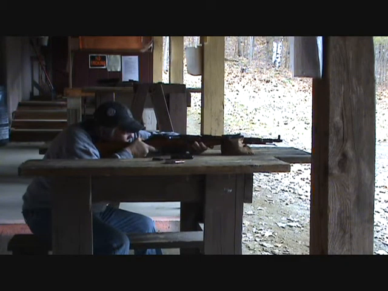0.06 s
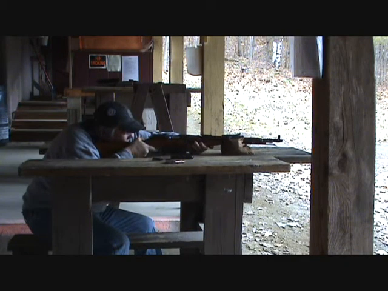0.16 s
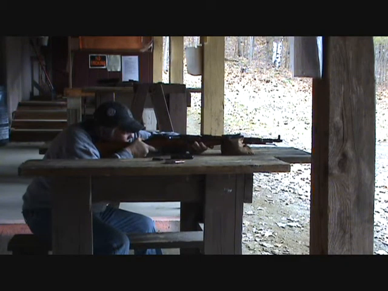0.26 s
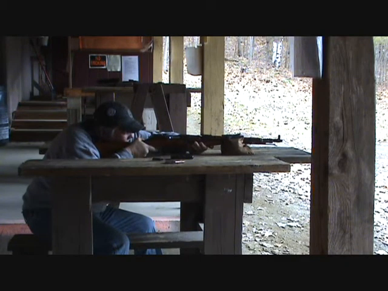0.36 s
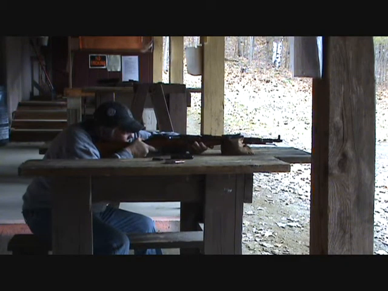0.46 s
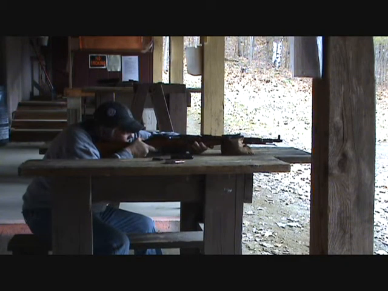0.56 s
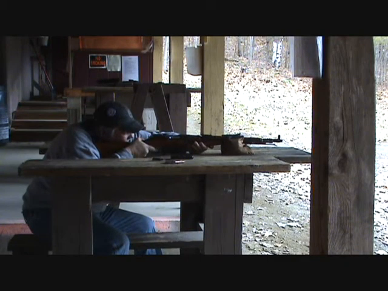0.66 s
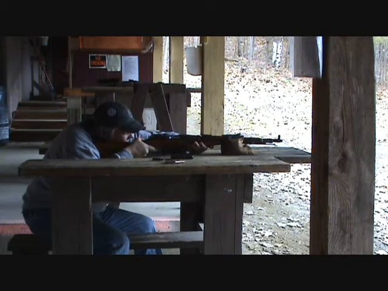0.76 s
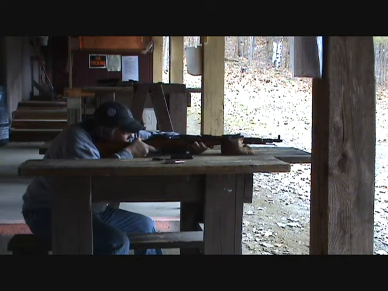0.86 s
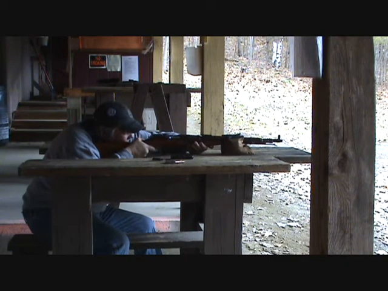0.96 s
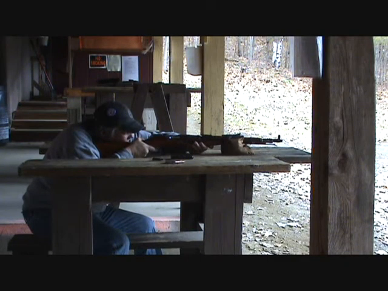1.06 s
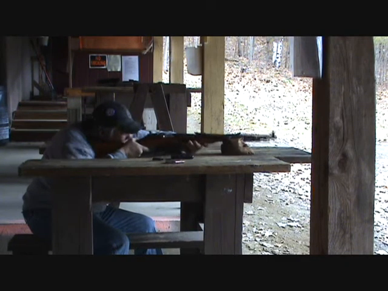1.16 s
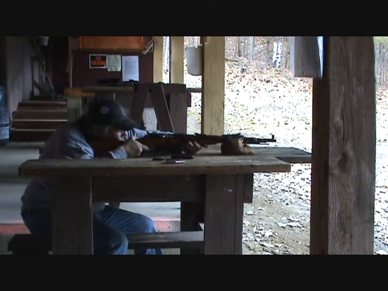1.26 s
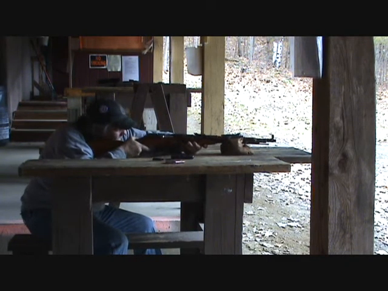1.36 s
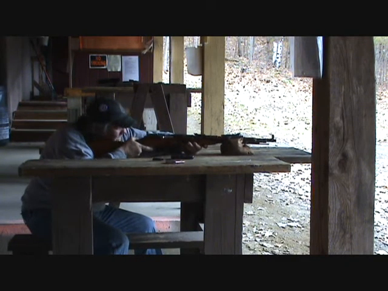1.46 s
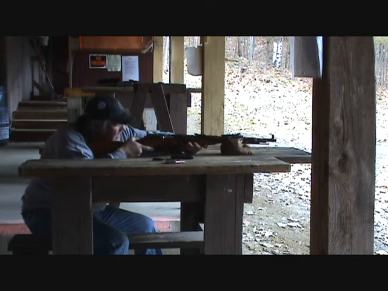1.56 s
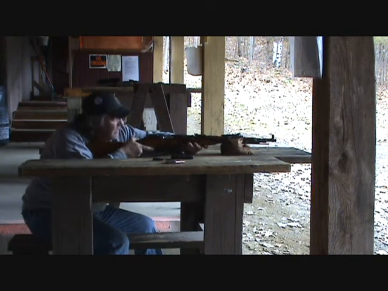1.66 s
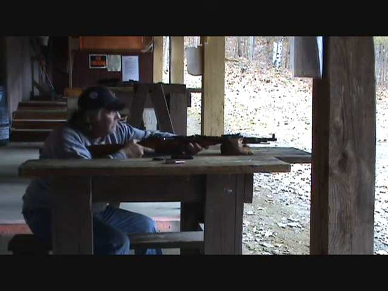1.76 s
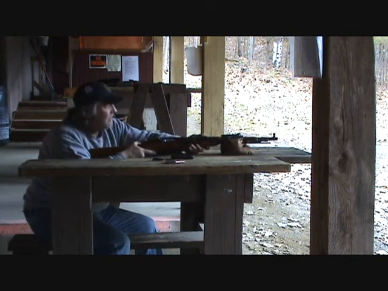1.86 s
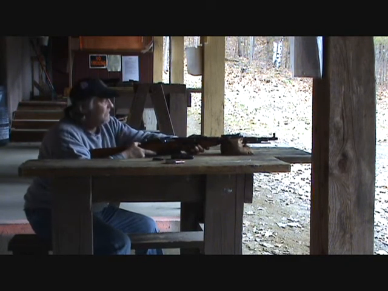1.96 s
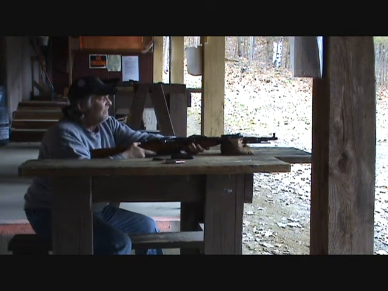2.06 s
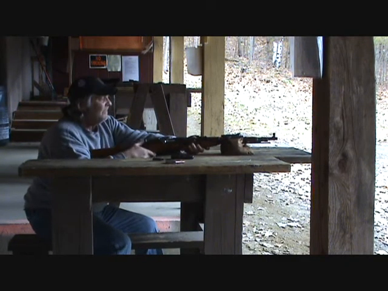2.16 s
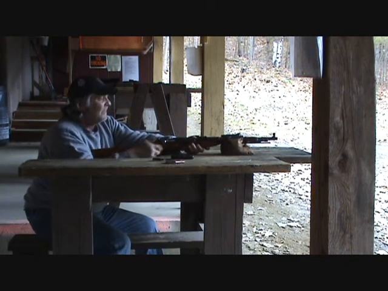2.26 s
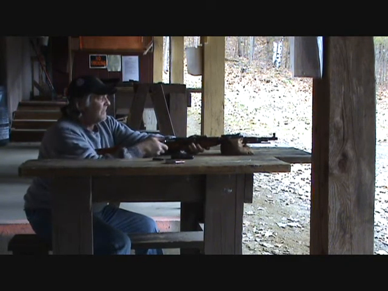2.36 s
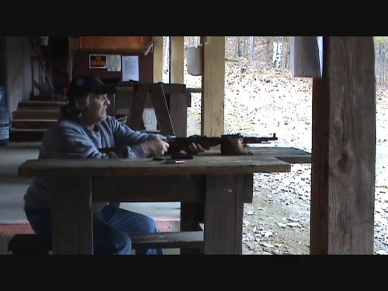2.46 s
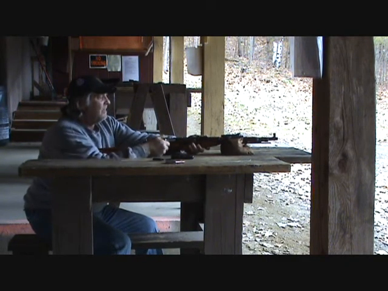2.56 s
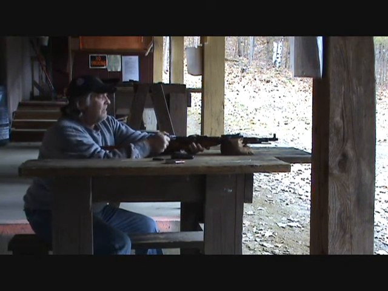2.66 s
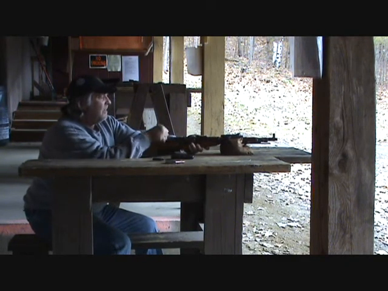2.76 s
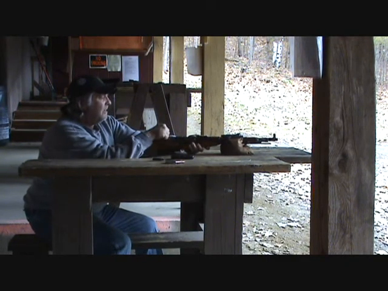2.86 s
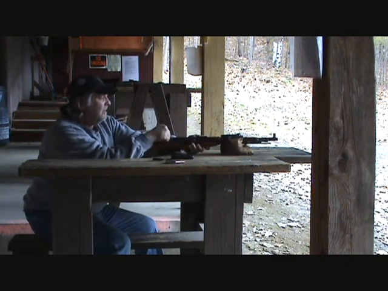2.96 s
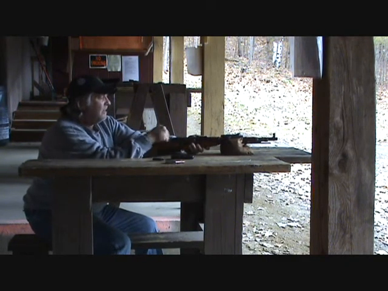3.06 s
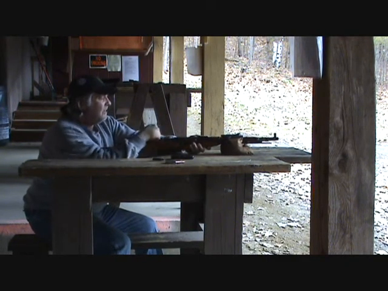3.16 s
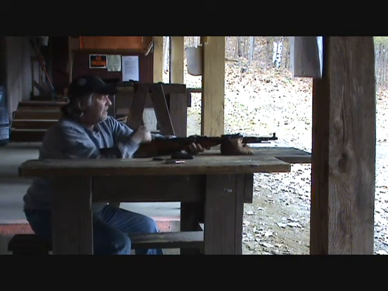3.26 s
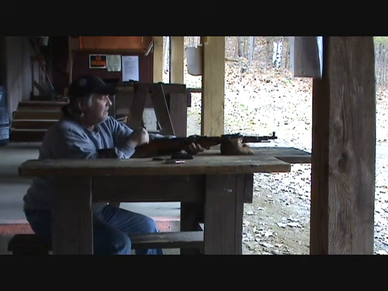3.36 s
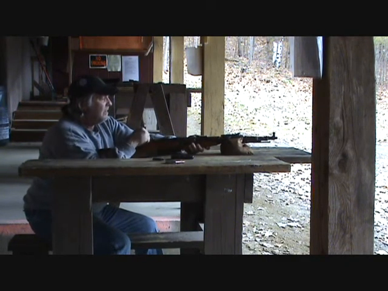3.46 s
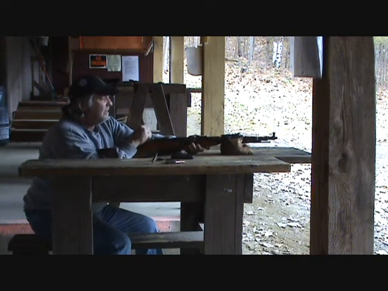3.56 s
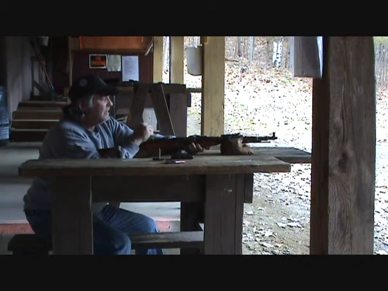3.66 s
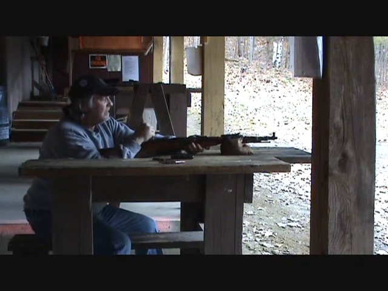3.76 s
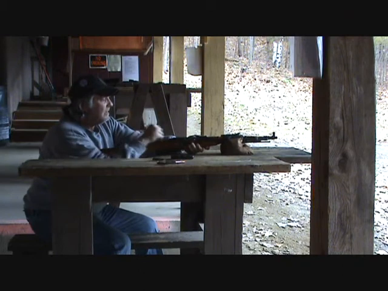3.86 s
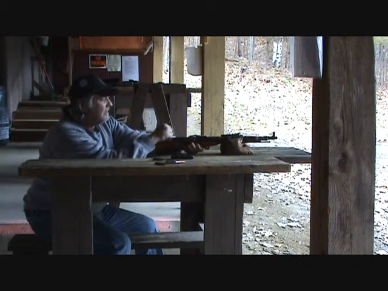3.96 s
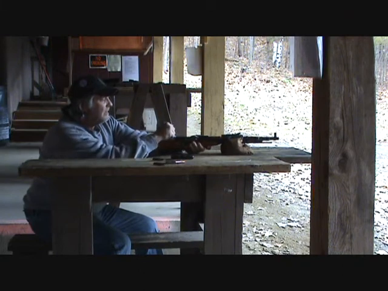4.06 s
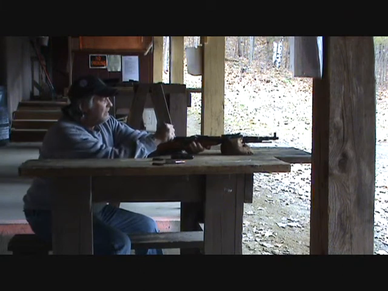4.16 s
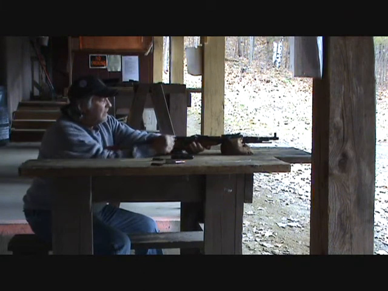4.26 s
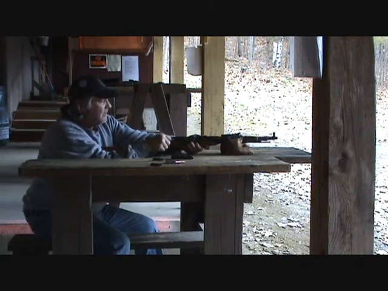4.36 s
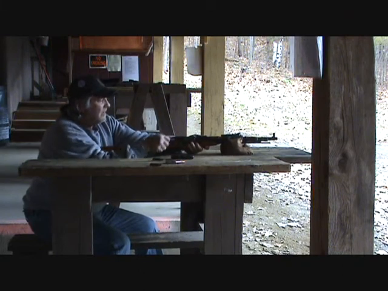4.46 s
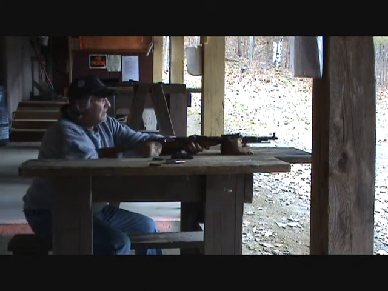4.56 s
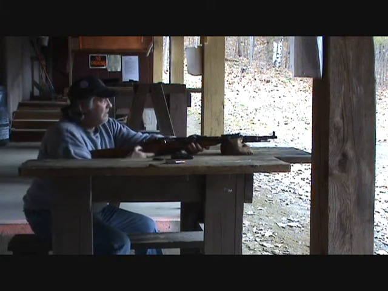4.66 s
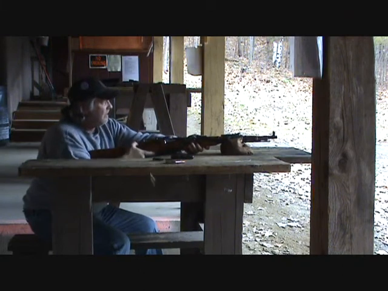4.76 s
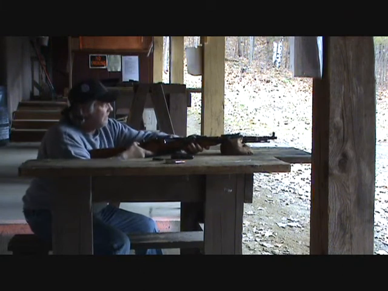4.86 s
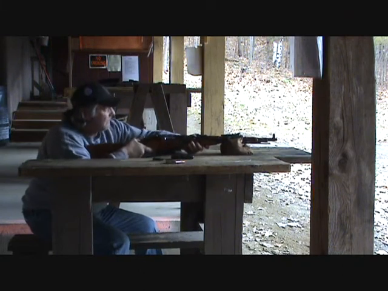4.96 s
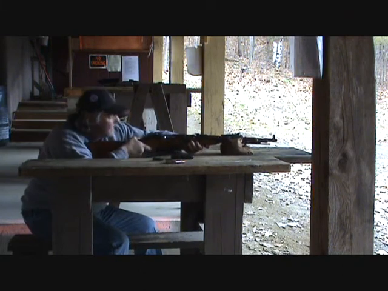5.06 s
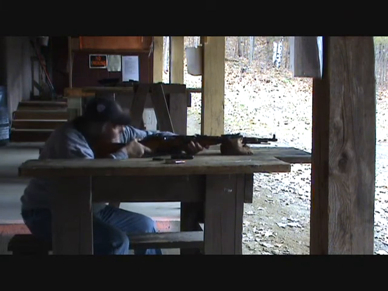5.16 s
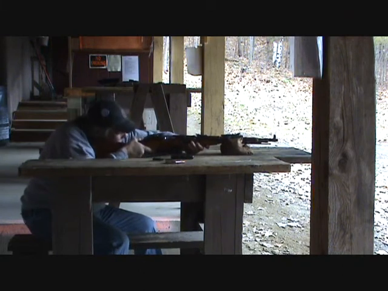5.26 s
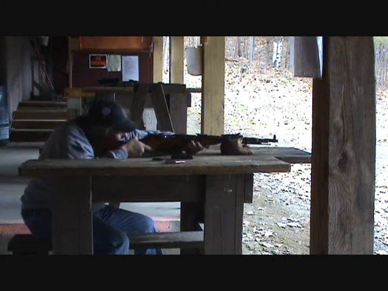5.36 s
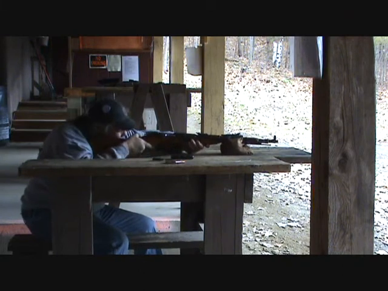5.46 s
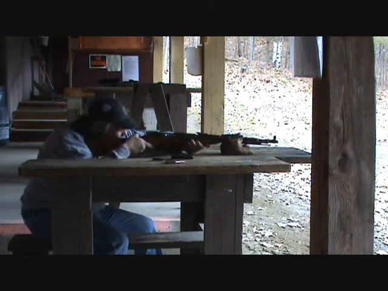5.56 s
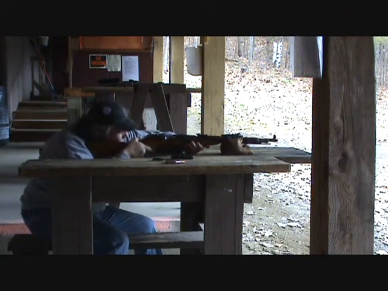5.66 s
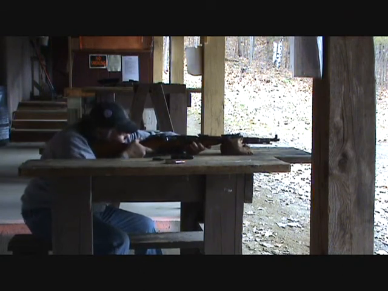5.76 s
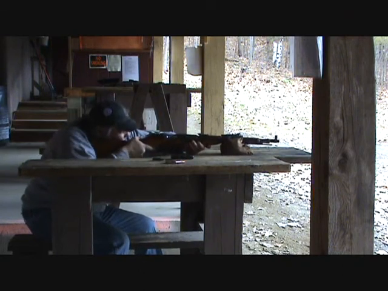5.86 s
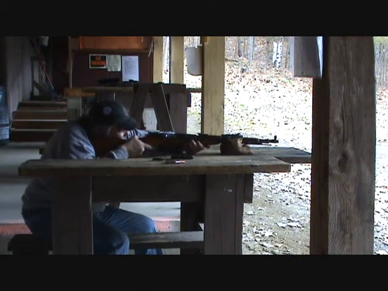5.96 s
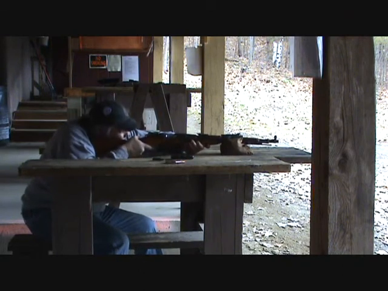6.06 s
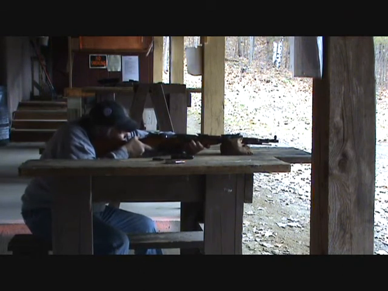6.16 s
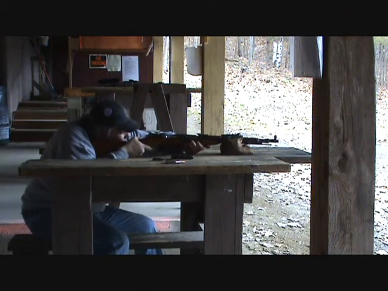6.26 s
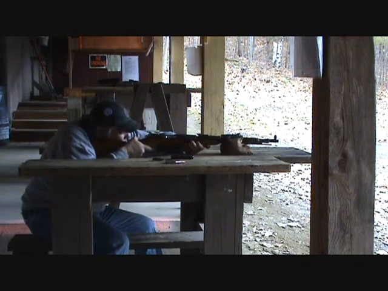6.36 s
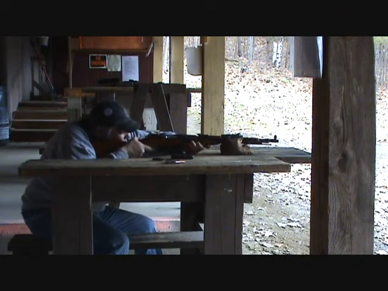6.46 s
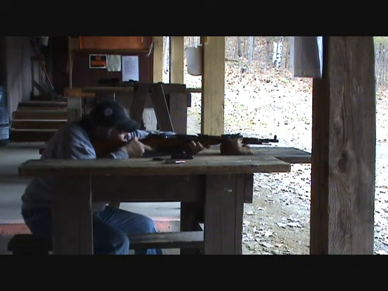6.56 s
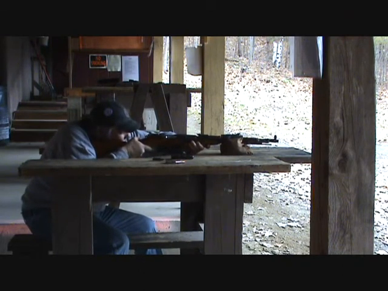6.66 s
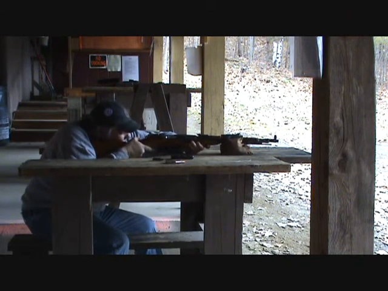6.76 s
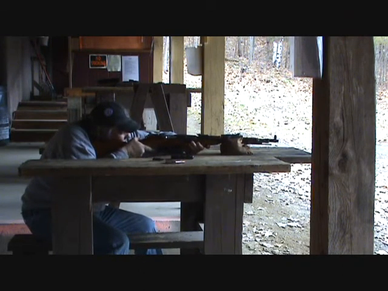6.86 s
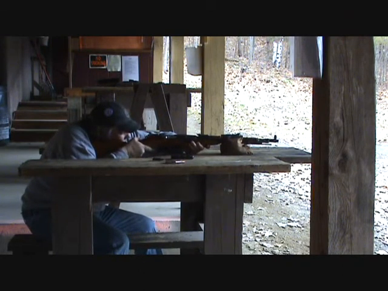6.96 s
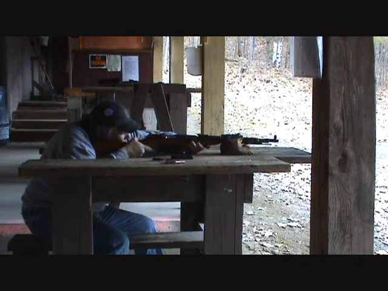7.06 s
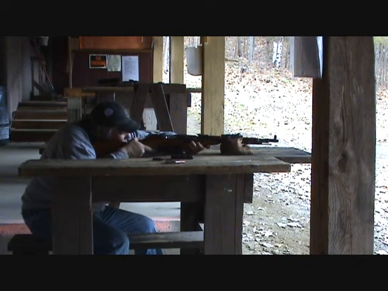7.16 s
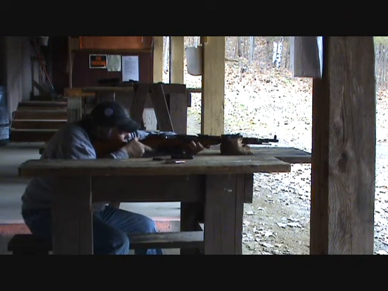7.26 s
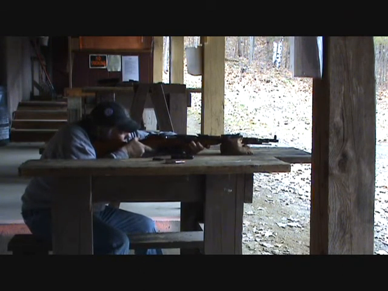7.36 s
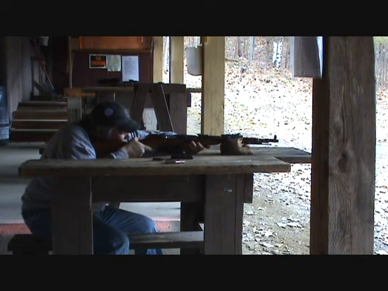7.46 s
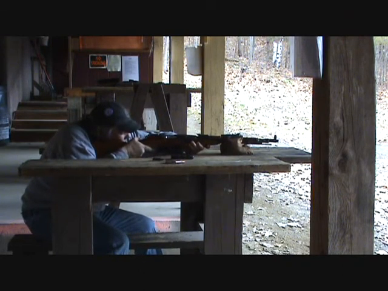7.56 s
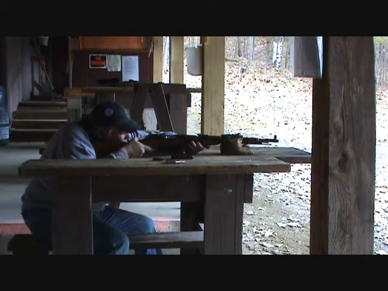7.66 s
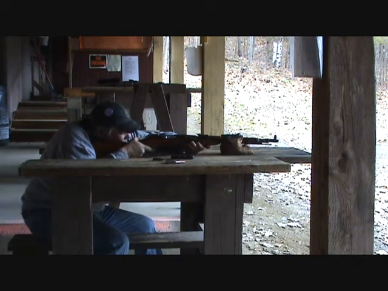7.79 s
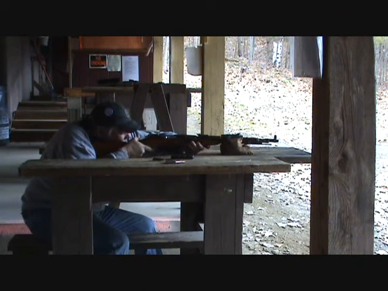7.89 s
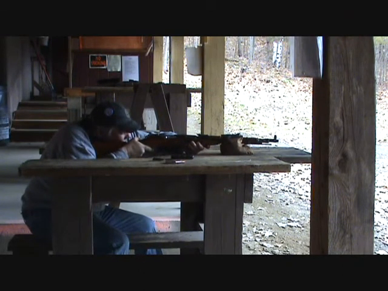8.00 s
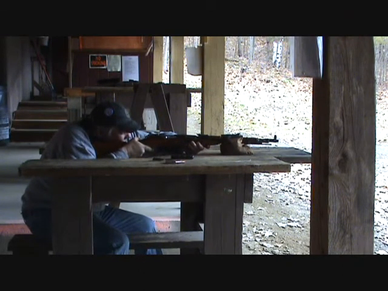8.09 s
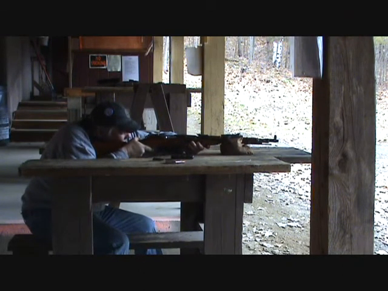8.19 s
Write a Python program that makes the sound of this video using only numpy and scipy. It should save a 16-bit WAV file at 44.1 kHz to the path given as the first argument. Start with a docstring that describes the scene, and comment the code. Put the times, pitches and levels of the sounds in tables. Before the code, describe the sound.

Close stereo pickup beside a shooting bench under an open wooden roof. A hard, saturated rifle blast bursts from near silence, followed by a dense reflected roar and a long rumbling woodland echo. Steel bolt parts clatter in two main stages, with a hollow wooden knock from the ejected brass case between them. A short scrape and squeak lead to locking clicks; the case then pings and skitters on concrete before quiet ticks and distant drone.

```python
"""One rifle shot from a bench under a wooden range shelter: a pressure pulse and a roar of filtered noise
overload the microphone, then patchy, dulling noise rolls away through the woods.
The bolt is lifted, drawn back, pushed home with a scrape and a squeak, and locked: chatter through steel resonances.
The ejected brass case knocks on the bench, rolls off and bounces on the concrete floor: decaying modes and clacks.
Soft ticks of the handled rifle and a quiet outdoor background with a far motor drone surround it."""
import sys
import numpy as np
from scipy import signal
from scipy.fft import rfft, irfft, next_fast_len
from scipy.io import wavfile
from scipy.ndimage import uniform_filter1d

SR = 44100
rng = np.random.default_rng(int(sys.argv[2]) if len(sys.argv) > 2 else 0)


def store_wav(level_fs):
    """Save 16-bit WAV to argv[1]."""
    pcm = np.round(np.clip(np.atleast_2d(level_fs), -1, 1) * 32767)
    wavfile.write(sys.argv[1], SR, pcm.T.astype(np.int16))


N = 362943
T = np.arange(N) / SR  # s

# outdoor background spectrum: f/Hz, relative level per Hz/dB
QUIET_SPECTRUM = [(20, -23.5), (60, -8), (120, -2), (200, -9.5), (420, -6.5), (620, -7), (1200, -13.5),
                  (2500, -20.5), (4000, -27.5), (7000, -32), (15500, -35.5)]
QUIET_DB = -52.5
# faint steady tones: f/Hz, level/dB
FAINT_TONES = [(2560, -77.5), (11550, -81.5)]
# far-off motor drone: t/s, f/Hz, level/dB
DRONE_PATH = [(0, 422, -76), (.7, 410, -69), (5.2, 412.6, -65.5), (6.3, 409.3, -61.5), (7.3, 411.8, -69),
              (7.599, 359.3, -67.5), (8.2, 356.6, -58.5)]
# stereo pickup of diffuse sound, one table per place: f/Hz, likeness/0-1, left minus right/dB
QUIET_FIELD_STEREO = [(80, 1, 2.5), (350, 0.59, 3.5), (1400, .3, -3), (5000, 0.072, -0.5), (11000, .6, 0)]
SHELTER_FIELD_STEREO = [(150, 1, 5.5), (903.4, 0.44, 1.94), (4000, 0.59, .5), (12000, .86, .5)]
ECHO_FIELD_STEREO = [(80, 0.98, 7.5), (180, 0.96, 6.5), (350, .47, 5), (700, 0.5, -1), (1400, 0.6, -3.5),
                     (3000, 0.8, -3.5), (10000, 0.7, -1.5)]

# hands shifting on the stock: t/s, level/dB
HANDLING_TICKS = [(.72, -60), (2.669, -51), (4.2371, -52), (4.67, -51.5), (5.47, -57), (6.49, -63),
                  (7.085, -57), (7.243, -59.5), (7.49, -63), (7.70, -61), (8.096, -59), (8.18, -60)]
# spectrum of a steel contact: f/Hz, relative level per Hz/dB
STEEL_SPECTRUM = [(290, -44.5), (500, -12.5), (1030, -5.5), (1560, -2), (1770, 0.5), (2390, -5.5),
                  (3330, -3.5), (5050, -5), (7450, -6), (15500, -24.5)]
# resonances of the action: f/Hz, half the filter width/Hz, level before random spread/dB
ACTION_RESONANCES = [(1030, 67, -5), (1690, 39, -4), (3370, 97, -5), (4700, 110, -10), (4900, 510, -7),
                     (6120, 170, -4.5), (6770, 52, -13), (7220, 82, -8), (7410, 76, -8.5)]

SHOT_S = 1.2066  # the muzzle blast reaches the microphone
# blast thrown about the shelter: delay/s, rise/s, t60/s, centre f/Hz, width of each filter pass/Hz,
# level before the envelope/dB
ROAR_BANDS = [(.001, .006, 0.33, 5500, 11000, -9.5), (.011, .004, 0.2, 1700, 2230, .5),
              (.030, .004, 0.089, 1800, 2000, 3), (.038, .012, 0.3, 820, 760, 1.5),
              (.088, .008, .2, 1004, 1590, -6.5), (.072, 0.012, 0.75, 125, 179, -11)]
# echo from the woods as it sounds at WOODS_S: f/Hz, relative level per Hz/dB
WOODS_SPECTRUM = [(15, -49.5), (25, -22), (43, -22.5), (64, -12), (120, -5), (250, -6), (501, -3.5),
                  (709, 0.5), (1030, -2.5), (1240, -5.5), (1860, -6.5), (2240, -9), (3440, -13),
                  (6200, -23), (15000, -62)]
WOODS_S = 1.5
# loss to air and foliage: f/Hz, loss/(dB per s)
AIR_LOSS = [(50, 3.5), (180, -2), (800, 2), (1700, 7), (3400, 18), (6000, 35), (11000, 64)]
# the echo sags steadily; once older than the hold time it also thins with each doubling of its path
ECHO_DB, ECHO_SAG_DB_PER_S, ECHO_HOLD_S, ECHO_DB_PER_DOUBLING = -11.5, 5, 0.76, 7
# swells within the echo, low rumbles and a brief hiss:
# t/s, time from peak to 1/e/s, centre f/Hz, width of each filter pass/Hz, level before the envelope/dB
ECHO_SWELLS = [(1.40, 0.063, 220.4, 110, -18.5), (1.83, 0.083, 99, 70.5, -27),
               (2.201, 0.065, 5600, 5000, -49), (3.58, .1, 187.7, 59.5, -41)]

# steel contacts as the bolt is lifted, drawn back, pushed home and locked:
# t/s, level/dB, brightness/(dB per octave)
BOLT_CONTACTS = [(2.56, -53, 13), (2.809, -27, -4), (2.843, -31.5, 6), (2.8478, -20.5, -3),
                 (3.1684, -32.5, -3.5), (3.1928, -24.5, 1), (3.3, -35.5, -1), (3.3343, -18.5, 4),
                 (3.3512, -14.5, 0), (3.879, -32, -10.5), (3.9522, -28.5, -4.5), (3.96, -25, 2.5),
                 (3.997, -25, 4), (4.0167, -27, -1), (4.0617, -21, -1.5), (4.2755, -37, -5),
                 (4.3130, -28, 2.5), (4.3415, -19.5, 2)]
# the case strikes ejector and floor: t/s, clack level/dB, brightness/(dB per octave), wall ring level/dB
CASE_STRIKES = [(3.342, -25, -5, -25), (5.195, -37, -3, -60), (5.1994, -23, -2, -23.5),
                (5.619, -55, -5.5, -77), (5.744, -31.5, -5, -40), (5.767, -37.5, -1, -47),
                (5.803, -35, -1.5, -44), (5.983, -35.5, -0.5, -45), (5.995, -30, 12, -51),
                (6.1, -46.5, -2, -64), (6.137, -38.5, -1.5, -55), (6.214, -43, 1.5, -52),
                (6.236, -45, 5.5, -36), (6.290, -48.5, 6, -40), (6.337, -51, 5, -43)]
# spectrum of the case's clack: f/Hz, relative level per Hz/dB
CLACK_SPECTRUM = [(150, -36), (400, -25), (900, -19.5), (1300, -2.5), (2400, -7), (5000, 2.5), (7500, -2.5),
                  (11000, -16.5), (15000, -21.5)]
# wall modes of the brass case: f/Hz, level before brightness/dB, t60/s
BRASS_MODES = [(4720, -19, 0.27), (10095, 1, 0.19), (10135, -7, 0.16), (10230, -18, .12),
               (11270, -21.5, .07), (13930, -9, 0.23), (13990, -8, .17)]
# the case lands on the wooden bench: t/s, thud level/dB, brightness/(dB per octave)
BENCH_KNOCKS = [(3.640, -29.5, 5.5), (3.656, -19.5, -1), (3.664, -29, -6), (3.808, -32.5, -6),
                (3.878, -33, 6)]
# modes of the bench planks: f/Hz, relative level before brightness/dB, t60/s
BENCH_MODES = [(440, -11, 0.083), (612, -7, 0.088), (925, -7, 0.1), (1386, -12, 0.052), (1696, -1, 0.077),
               (2500, -5, 0.067), (4150, -17, .08)]
# spectrum of the bench thud: f/Hz, relative level per Hz/dB
THUD_SPECTRUM = [(80, -40), (250, -17), (900, 1), (1800, -1), (4500, -13.5), (12000, -50.5)]
# push of the bolt: the scrape grows from SLIDE_DB during the push, then dies as the bolt seats
SLIDE_S, SLIDE_PUSH_S, SLIDE_DB, SLIDE_GROWTH_DB_PER_S, SLIDE_T60_S = 3.877, 0.08, -37.5, 85, .22
TOP_HZ = 15800  # top of the recorded band


def amp(db):
    """Decibels to gain."""
    return 10 ** (np.asarray(db) / 20)


def unit(x):
    """Scale to rms 1."""
    return x / np.sqrt(np.mean(x ** 2))


def at_hz(rows, hz, axis=1):
    """Read a column of a table on a log-frequency axis."""
    rows = np.array(rows, float)
    return np.interp(np.log(hz + 1), np.log(rows[:, 0]), rows[:, axis])


def fade(t, t60):
    """Exponential decay, 60 dB down after t60 seconds."""
    return np.exp(-np.log(1000) * t / max(abs(t60), 1e-3))


def add(track, s, x):
    """Mix x in at time s."""
    i = int(s * SR)
    track[..., i:i + x.shape[-1]] += x[..., :N - i]


def colour(x, spectrum, tilt_db=0, size=4096):
    """Minimum-phase filter from (f/Hz, level/dB) points, tilted per octave above 500 Hz."""
    hz = np.fft.rfftfreq(size, 1 / SR)
    tilt = tilt_db * np.log2(np.maximum(hz, 500))
    gain = unit(amp(at_hz(spectrum, hz) + tilt))
    # folding the cepstrum forward makes the response start at once
    cepstrum = irfft(np.log(gain))
    cepstrum[1:size // 2] *= 2
    cepstrum[size // 2 + 1:] = 0
    response = irfft(np.exp(rfft(cepstrum)))
    return np.apply_along_axis(lambda row: signal.fftconvolve(row, response)[:len(row)], -1, x)


def resonate(x, hz, width_hz):
    """Two-pole band-pass, gain 1 at the centre."""
    return signal.lfilter(*signal.iirpeak(hz, hz / min(width_hz, SR / 4), SR), x)


def diffuse(field, size=N):
    """White noise as two neighbouring microphones hear it, more or less alike in each band."""
    mid, side = rfft(rng.standard_normal((2, next_fast_len(size, True))))
    hz = np.linspace(0, SR / 2, len(mid))
    alike = np.clip(at_hz(field, hz), 0, 1)
    sign = np.array([[1], [-1]])  # left, right
    balance_db = sign * at_hz(field, hz, axis=2)
    pair = np.sqrt(1 + alike) * mid + sign * np.sqrt(1 - alike) * side
    pair = pair * amp(balance_db / 2)
    evened = pair / np.sqrt(np.mean(amp(balance_db), axis=0))  # balance leaves the power unchanged
    return unit(irfft(evened)[:, :size])


def strength(x, db):
    """Set the rms of a hit, its energy counted over 10 ms."""
    energy = np.mean(np.sum(x ** 2, axis=-1))
    return x * amp(db) / np.sqrt(energy / (SR / 100))


def background():
    """Distant outdoor rumble and soft hiss from shaped noise, with a wandering far drone and two faint tones."""
    s, hz, db = np.transpose(DRONE_PATH)
    wander = np.interp(T, np.linspace(0, T[-1], 120), rng.standard_normal(120))
    drone_hz = np.interp(T, s, hz) * (1 + .01 * wander)
    drone = amp(np.interp(T, s, db)) * np.sin(2 * np.pi * np.cumsum(drone_hz) / SR)
    tones = sum(amp(db) * np.sin(2 * np.pi * hz * T) for hz, db in FAINT_TONES)
    air = unit(colour(diffuse(QUIET_FIELD_STEREO), QUIET_SPECTRUM)) * amp(QUIET_DB)
    return air + np.sqrt(2) * (tones + drone)


def shelter(wet_db=-2, t60=0.22, early_db=-2, early_t60=0.077):
    """Reflections of one hit: bench and posts answer at once, roof and floor a little later and duller."""
    t = T[:SR // 2]
    late = diffuse(SHELTER_FIELD_STEREO, size=len(t)) * fade(t, t60) * (1 - np.exp(-t / .005))
    late = colour(late, [(300, 12.5), (5000, 2.5), (9000, 0), (15000, -8.5)], size=512)
    sparse = rng.random(len(t)) < .05
    early = diffuse(SHELTER_FIELD_STEREO, size=len(t)) * sparse * fade(t, early_t60)
    return (amp(wet_db) * unit(late) + amp(early_db) * unit(early)) / np.sqrt(len(t))


def contact(t60, snap, uneven_db=3):
    """A sharp first touch and a dying chatter of tiny ones, with their reflections."""
    t = T[:SR // 2]
    uneven = amp(uneven_db * rng.standard_normal(len(t)))
    chatter = rng.standard_normal(len(t)) * uneven * fade(t, t60)
    chatter[0] += snap * np.sqrt(np.sum(chatter ** 2))
    return unit(chatter) / np.sqrt(len(t)) + shelter()


def action(x, tilt_db, ring_db=2, spread_db=3, detune=0.044):
    """Steel colour: a broad clank whose resonances vary in pitch and level from call to call."""
    x = colour(x, STEEL_SPECTRUM, tilt_db)
    chance = rng.standard_normal((len(ACTION_RESONANCES), 2))
    ringing = 0
    for (hz, half_width, db), (level, pitch) in zip(ACTION_RESONANCES, chance):
        ringing = ringing + amp(db + spread_db * level) * resonate(x, hz * (1 + detune * pitch), 2 * half_width)
    return x + amp(ring_db) * ringing


def handling(bright_db=-3, chatter_t60=.05, snap=.2):
    """Loose steel parts tick softly as the rifle is shifted."""
    out = np.zeros((2, N))
    for s, db in HANDLING_TICKS:
        add(out, s, strength(action(contact(chatter_t60, snap), bright_db), db))
    return out


def lead_in_clicks(db=-21, lead_s=0.0063, gap_s=0.0036):
    """Two short, faint steel-coloured clicks lead into the blast."""
    out = np.zeros((2, N))
    first = action(contact(.02, 0.41), 0)
    add(out, SHOT_S - lead_s, strength(first, db - 8))
    second = action(contact(.006, .8), -1)
    add(out, SHOT_S - lead_s + gap_s, strength(second, db))
    return out


def blast(push_db=-5, push_s=0.0017):
    """The muzzle's pressure pulse, push then suction, and the roar of its reflections under the roof."""
    out, t = np.zeros((2, N)), T[:SR]
    add(out, SHOT_S, amp(push_db) * (1 - t / push_s) * np.exp(-t / push_s))
    for delay, rise, t60, hz, width, db in ROAR_BANDS:
        noise = diffuse(SHELTER_FIELD_STEREO, size=SR)
        band = unit(resonate(resonate(noise, hz, width), hz, width))
        envelope = (1 - np.exp(-t / rise)) * fade(t, t60)
        add(out, SHOT_S + delay, amp(db) * band * envelope)
    return out


def woods(patchy_db=1.0):
    """Countless trunks scatter the shot back in clumps; longer paths lose their treble."""
    noise = unit(colour(diffuse(ECHO_FIELD_STEREO), WOODS_SPECTRUM))
    hz, s, cells = signal.stft(noise, SR, nperseg=512)
    clumps = uniform_filter1d(rng.standard_normal(cells.shape[1:]), size=5, axis=1)  # along time
    clumps = unit(uniform_filter1d(clumps, size=14, axis=0))  # along frequency
    loss_db = at_hz(AIR_LOSS, hz)[:, None] * (np.maximum(s, SHOT_S) - WOODS_S)
    echo = signal.istft(cells * amp(patchy_db * clumps - loss_db), SR)[1][:, :N]
    age = np.maximum(T - SHOT_S, 0)
    doublings = np.log2(np.maximum(age / ECHO_HOLD_S, 1))
    level_db = ECHO_DB - ECHO_SAG_DB_PER_S * age - ECHO_DB_PER_DOUBLING * doublings
    return echo * amp(level_db) * np.minimum(age / 0.012, 1)  # 12 ms onset


def swells():
    """The rolling echo swells briefly in one band or another."""
    out, t = np.zeros((2, N)), T[:SR] - .5
    for s, length_s, hz, width, db in ECHO_SWELLS:
        noise = diffuse(ECHO_FIELD_STEREO, size=SR)
        band = unit(resonate(resonate(noise, hz, width), hz, width))
        add(out, s - .5, amp(db) * band * np.exp(-(t / length_s) ** 2))
    return out


def bolt(snap=0.23, chatter_t60=0.049):
    """Steel stops hit one after another, each sounding the receiver."""
    out = np.zeros((2, N))
    for s, db, bright_db in BOLT_CONTACTS:
        add(out, s, strength(action(contact(chatter_t60, snap), bright_db), db))
    return out


def ring(modes, room_db=-1):
    """Freely decaying modes, set off from rest; reflections make them flutter."""
    t = T[:SR // 2]
    tone = 0
    for hz, db, t60 in modes:
        tone = tone + amp(db) * fade(t, t60) * rng.choice([-1, 1]) * np.sin(2 * np.pi * hz * t)
    reflected = signal.fftconvolve(tone[None], shelter(), axes=1)[:, :len(t)]
    return tone + amp(room_db) * reflected


def case(snap=0.39, chatter_t60=0.19, column_hz=1310, column_width_hz=80, column_db=-13, column_per_bright=1.23):
    """Each strike clacks, rings the brass wall and sounds the air in the open case, more so when dull."""
    out = np.zeros((2, N))
    for s, db, bright_db, wall_db in CASE_STRIKES:
        touch = contact(chatter_t60, snap)
        wall = [(hz, mode_db + bright_db * np.log2(hz / BRASS_MODES[1][0]), t60)
                for hz, mode_db, t60 in BRASS_MODES]
        add(out, s, strength(colour(touch, CLACK_SPECTRUM, bright_db), db))
        add(out, s, amp(wall_db) * ring(wall))
        air_column = resonate(touch, column_hz, column_width_hz)
        add(out, s, strength(air_column, db + column_db - column_per_bright * bright_db))
    return out


def bench(modes_db=-4):
    """The planks answer the falling case with a short, hollow knock of modes and thud."""
    out = np.zeros((2, N))
    for s, db, bright_db in BENCH_KNOCKS:
        modes = [(hz, mode_db + bright_db * np.log2(hz), t60) for hz, mode_db, t60 in BENCH_MODES]
        add(out, s, strength(ring(modes), db + modes_db))
        add(out, s, strength(colour(contact(0.059, 0.62), THUD_SPECTRUM, bright_db), db))
    # a light case moves no bass
    return signal.sosfilt(signal.butter(2, 250, "high", fs=SR, output="sos"), out)


def roll(start_s=3.808, landing_db=-27, bump_db=-43, bumps_per_s=75, plank_hz=975, plank_t60=0.082,
         detune=0.13, count=11):
    """The case drops on its side and rolls; each little bump sounds the plank at a slightly different pitch."""
    out = np.zeros((2, N))
    add(out, start_s, amp(landing_db) * ring([(plank_hz, 0, plank_t60)]))
    for k, (late, pitch) in enumerate(rng.uniform(-1.01, 1, (count, 2)), 1):
        bump = ring([(plank_hz * (1 + detune * pitch), 0, plank_t60)])
        add(out, start_s + (k + late / 2) / bumps_per_s, amp(bump_db) * bump)
    return out


def slide(grit_db=5, bright_db=-3.0):
    """The bolt scrapes forward along its rails in tiny catches, louder as it speeds up."""
    out, t = np.zeros((2, N)), T[:SR // 2]
    steps = np.repeat(rng.standard_normal(len(t) // 100 + 1), 100)[:len(t)]  # a new catch every 100 samples
    catches = amp(grit_db * steps)
    scrape = unit(action(diffuse(SHELTER_FIELD_STEREO, size=len(t)) * catches, bright_db))
    growth = amp(SLIDE_DB + SLIDE_GROWTH_DB_PER_S * np.minimum(t, SLIDE_PUSH_S))
    seating = fade(np.maximum(t - SLIDE_PUSH_S, 0), SLIDE_T60_S)
    add(out, SLIDE_S, scrape * growth * seating)
    return out


def squeak(hz=6280, db=-22, waver_share=0.0082):
    """Sticking steel sings for an instant, its pitch wavering, as the bolt goes home."""
    swell = np.exp(-((T - 4.002) / .007) ** 4)
    swell = swell + .17 * np.exp(-((T - 4) / .045) ** 2)  # softer, longer skirt
    waver = unit(uniform_filter1d(rng.standard_normal(N), size=100))
    phase = 2 * np.pi * np.cumsum(hz * (1 + waver_share * waver)) / SR
    return amp(db) * swell * np.sqrt(2) * np.sin(phase)


def scene():
    """The shot and its echo, then the small sounds at the bench."""
    shot = lead_in_clicks() + blast() + woods() + swells()
    return shot + bolt() + slide() + squeak() + handling() + case() + bench() + roll() + background()


def record(dry, ceiling=.85):
    """The microphone stage flattens the blast smoothly below its ceiling; the top is cut."""
    flattened = dry / (1 + (dry / ceiling) ** 4) ** (1 / 4)
    return signal.sosfilt(signal.ellip(8, .2, 70, TOP_HZ, fs=SR, output="sos"), flattened)


dry = scene()
out = record(dry)
store_wav(out)
```